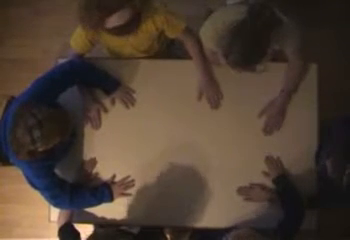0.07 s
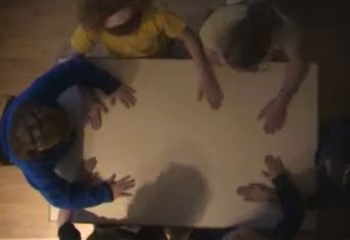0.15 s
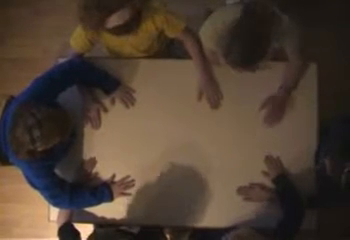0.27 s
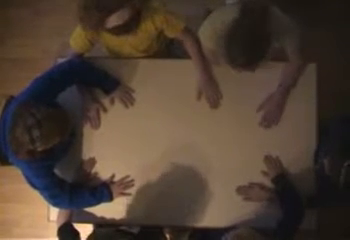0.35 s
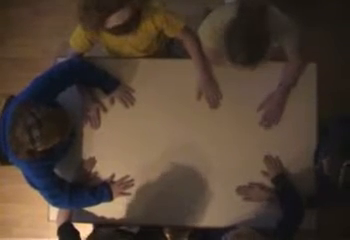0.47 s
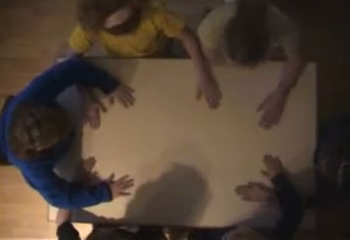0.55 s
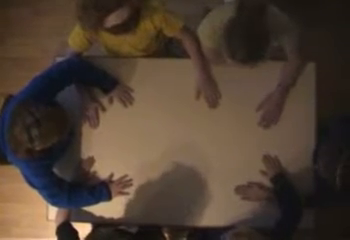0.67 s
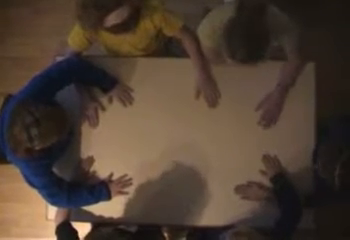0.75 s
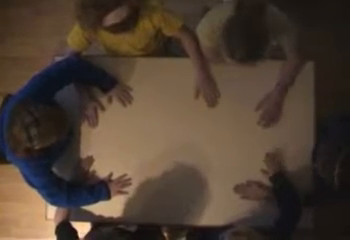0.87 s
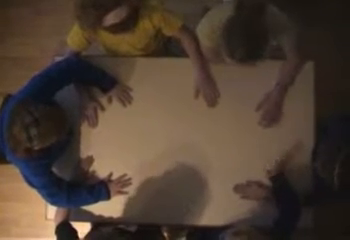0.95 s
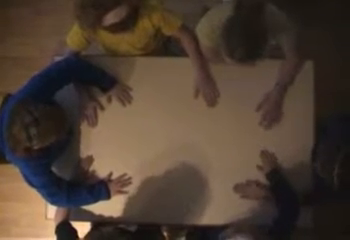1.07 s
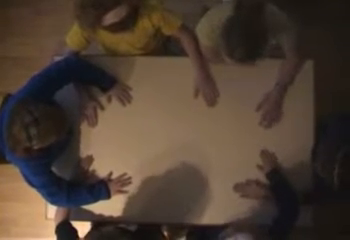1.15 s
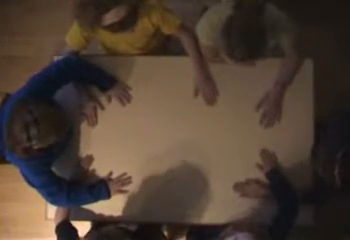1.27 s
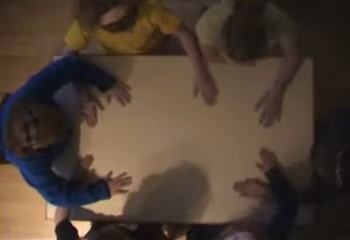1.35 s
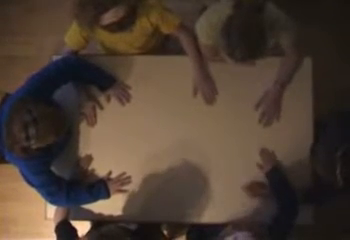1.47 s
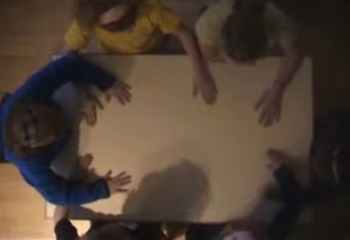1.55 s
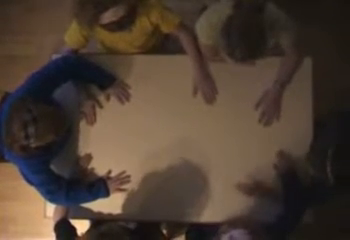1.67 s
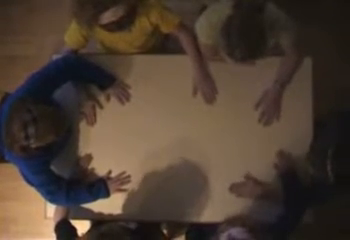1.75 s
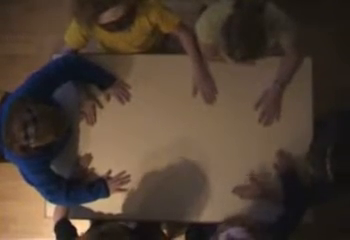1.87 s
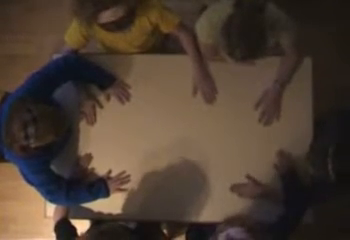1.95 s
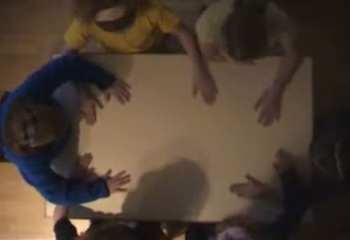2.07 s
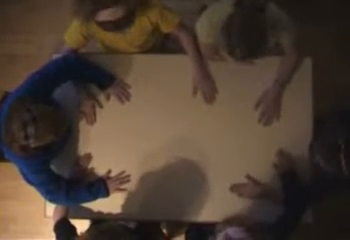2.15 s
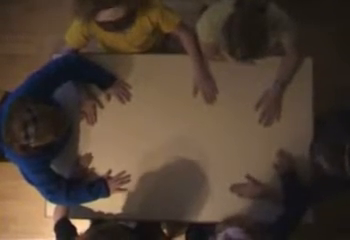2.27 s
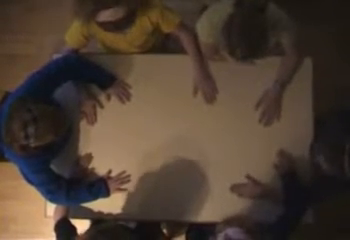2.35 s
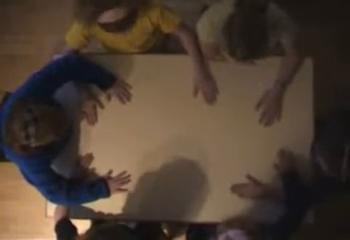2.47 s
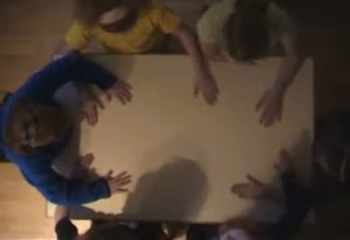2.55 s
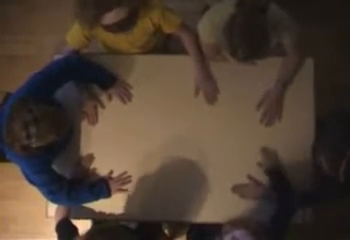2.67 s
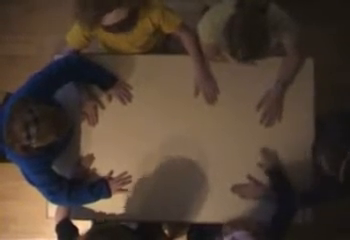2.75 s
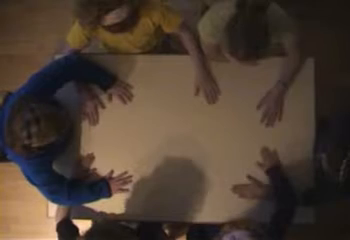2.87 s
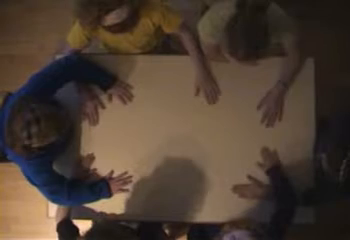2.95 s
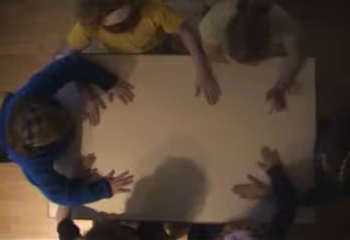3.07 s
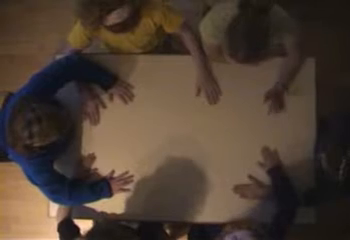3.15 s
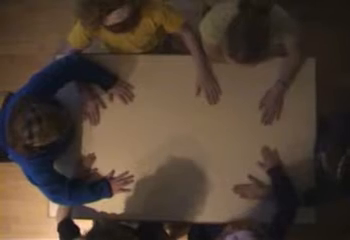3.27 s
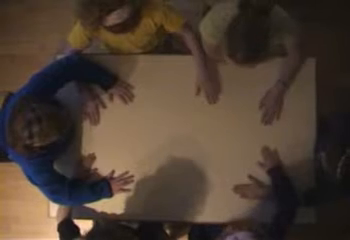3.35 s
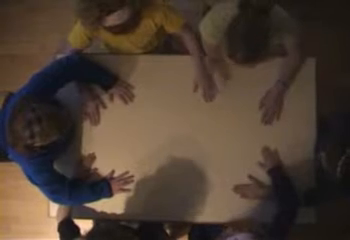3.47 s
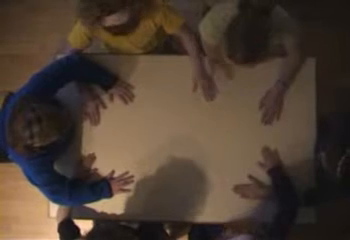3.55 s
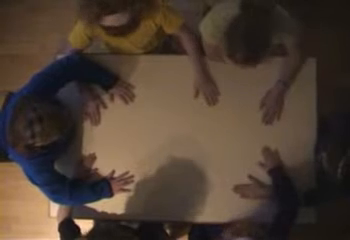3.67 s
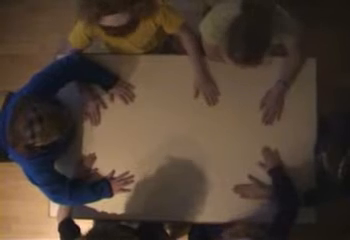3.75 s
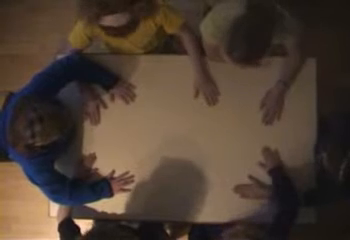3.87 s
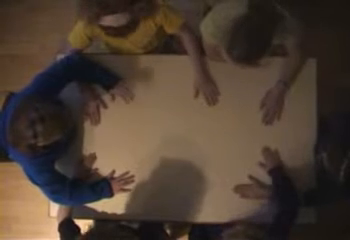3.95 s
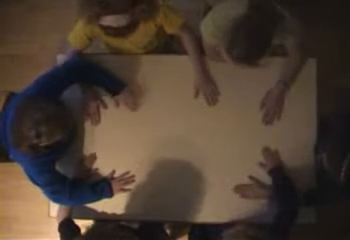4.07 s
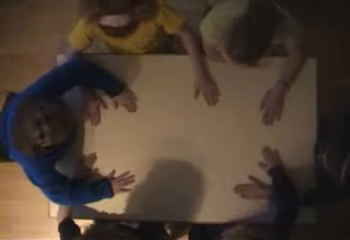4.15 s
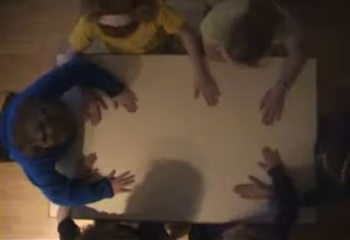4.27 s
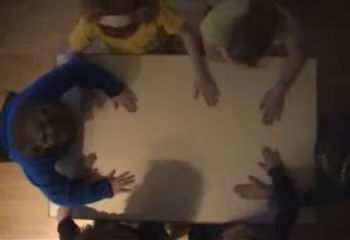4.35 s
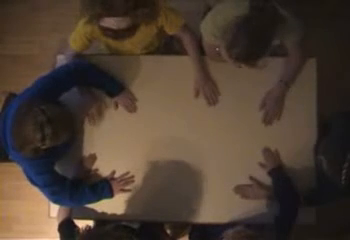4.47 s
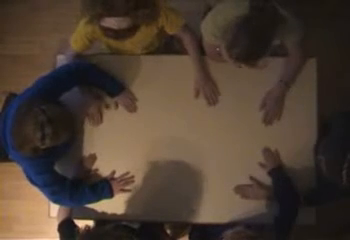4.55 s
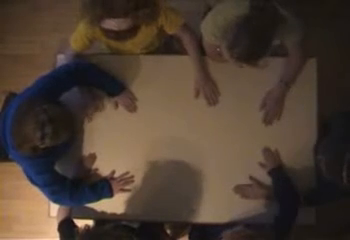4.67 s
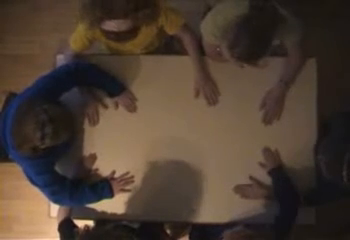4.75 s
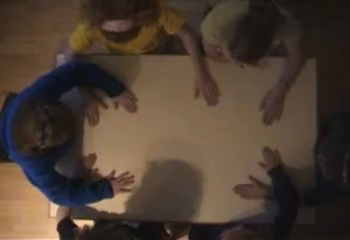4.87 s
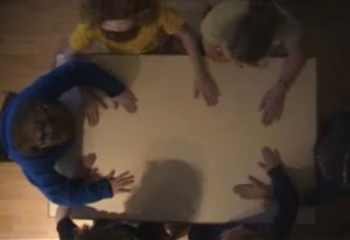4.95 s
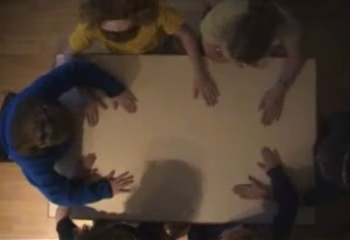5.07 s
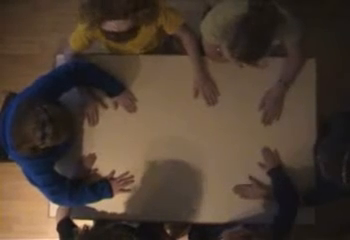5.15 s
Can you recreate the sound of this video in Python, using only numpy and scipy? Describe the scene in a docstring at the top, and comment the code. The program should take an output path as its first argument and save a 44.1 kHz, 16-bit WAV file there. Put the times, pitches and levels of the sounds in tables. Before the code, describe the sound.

Bare palms slap a wooden tabletop one at a time, unevenly spaced. A soft sleeve brush precedes a muffled double-contact slap, then a second brush and a bright, hard slap. A quick pair follows, then single slaps that come closer together and mostly softer. Each cracks, knocks and leaves a short room tail. The microphones are close, in stereo, with low hiss and a thin electronic whine.

```python
"""Flat-handed slaps on a tabletop

Hands slap a tabletop one after another in a bare room, under an overhead camera.
Each palm squeezes out a puff of air (a pressure pulse), the skin cracks and the board knocks (noise bursts),
the board rings (decaying sine modes), and the room answers with echoes and a diffuse tail.
Two sleeve brushes (swelling noise) come early; beneath lie room tone, hiss and a thin whine of steady tones."""
import sys
import numpy as np
from scipy import signal
from scipy.fft import rfft, irfft
from scipy.io import wavfile
from scipy.ndimage import uniform_filter1d

SR = 44100
rng = np.random.default_rng(int(sys.argv[2]) if len(sys.argv) > 2 else 0)


def output_pcm(signal):
    """Save a mono or channel-first signal as 16-bit PCM at the path in sys.argv[1].

    Samples are clipped to [-1, 1] before scaling.
    """
    pcm = np.clip(np.atleast_2d(signal).T, -1, 1) * 32767
    wavfile.write(sys.argv[1], SR, np.round(pcm).astype(np.int16))


N = 229394

SLAP_SAMPLES, LEAD_SAMPLES = 49152, 1024  # length of one slap, and the part of it before the palm lands
T = (np.arange(SLAP_SAMPLES) - LEAD_SAMPLES) / SR  # time from landing (s)
AFTER = np.maximum(T, 0)
HZ = np.fft.rfftfreq(SLAP_SAMPLES, 1 / SR)
SCENE_HZ = np.fft.rfftfreq(N, 1 / SR)
LANDING_S = 0.0011  # time the palm takes to close on the board


def amp(db):
    """Decibel law: 20 dB is a tenfold amplitude."""
    return 10 ** (np.asarray(db) / 20)


def read(points, hz):
    """Spectral envelope: joins (Hz, value) points by straight lines on a log-frequency axis."""
    f, value = np.transpose(points)
    return np.interp(np.log(hz + 1), np.log(f + 1), value)


def hump(hz, centre_hz, octaves):
    """Broad resonance: a bell curve on the log-frequency axis."""
    return np.exp(-(np.log2((hz + 1) / centre_hz) / octaves) ** 2)


def add(mix, start_s, sound):
    """Superposition: sums a two-channel sound into the mix from a given time."""
    part = mix[:, round(start_s * SR):][:, :sound.shape[1]]
    part += sound[:, :part.shape[1]]


def low_pass(x, hz):
    """Band limiting: a steep linear-phase low-pass on both channels."""
    taps = signal.firwin(255, hz, window=("kaiser", 9), fs=SR)
    return signal.oaconvolve(x, taps[None], "same")


def high_pass(x, hz):
    """Bass roll-off: a second-order high-pass."""
    return signal.sosfilt(signal.butter(2, hz, "high", fs=SR, output="sos"), x)


def stereo_noise(width, size):
    """Partial coherence: spectra of white noise at two close microphones, a common part plus and minus a side."""
    mid, side = rfft(rng.standard_normal((2, size)))
    side = side * amp(read(width, np.fft.rfftfreq(size, 1 / SR)))
    return np.array([mid + side, mid - side])


def burst(spectrum, rise_s, t60, delay_s):
    """Exponential growth and decay: shaped noise swells, peaks after the delay and dies away."""
    t = T - delay_s
    rise = np.exp(np.minimum(t, 0) / rise_s)
    decay = amp(-60 * np.maximum(t, 0) / t60)
    envelope = rise * decay
    return irfft(spectrum) * envelope / np.linalg.norm(envelope)


# tones of the camera's whine: pitch_hz, level_db (rms)
WHINE_TONES = [(2853, -73), (6277, -71.5), (7418, -72), (8468, -72.5), (8565, -80), (8656, -67.5),
               (9227, -71.5), (9609, -67), (9798, -81), (10180, -77)]


def whine():
    """Common frequency modulation: the sine tones of the camera share one slightly unsteady clock."""
    drift = uniform_filter1d(rng.standard_normal(N), size=3000)
    clock_s = np.cumsum(1 + 0.000307 * drift / drift.std()) / SR
    tones = sum(amp(level_db) * np.sin(2 * np.pi * (pitch_hz * clock_s + rng.random()))
                for pitch_hz, level_db in WHINE_TONES)
    return np.sqrt(2) * tones  # peak from rms


# spectrum of room tone and hiss: frequency_hz, relative level_db (per Hz)
QUIET_TONE = [(15, -8), (25, 6), (60, 2.5), (136, 6.5), (187, 4), (480, 2.5), (620, -4.5), (846, -2.5),
              (2500, -9.5), (3500, -12), (4700, -7), (6000, -13.5), (8600, -5), (12500, -15)]
# stereo width of room tone and hiss: frequency_hz, side_db (against mid)
QUIET_WIDTH = [(60, -8.5), (240, -11), (950, -9), (3770, -7.5), (15000, -1)]


def background():
    """Stationary noise: room tone and microphone hiss, with the camera's faint whine."""
    quiet_db, hiss_edge_hz = -52.5, 12600  # rms level before the low-pass, and its edge
    hiss = irfft(stereo_noise(QUIET_WIDTH, N) * amp(read(QUIET_TONE, SCENE_HZ)), N)
    return low_pass(amp(quiet_db) * hiss / hiss.std(), hiss_edge_hz) + whine()


# stereo width of sleeves, slap noise and room: frequency_hz, side_db (against mid)
WIDTH = [(100, -27), (400, -22), (1000, -17), (2000, -12.5), (4000, -12.5), (8000, -7.5), (12000, -3)]
# sleeves brushing as an arm swings: middle_s, length_s, level_db (rms at the loudest), pitch_hz
SLEEVES = [(0.393, 0.15, -55, 1970), (1.077, 0.15, -57, 1460)]


def sleeve(middle_s, length_s, level_db, pitch_hz):
    """Friction noise: cloth brushes softly in one broad band, loudest in the middle of the swing."""
    rub = irfft(stereo_noise(WIDTH, N) * hump(SCENE_HZ, pitch_hz, octaves=1.2), N)
    swing = np.exp(-(2 * (np.arange(N) / SR - middle_s) / length_s) ** 2)
    return amp(level_db) * swing * rub / rub.std()


def radiated(pressure, low_hz):
    """Acoustic short circuit: below low_hz the air just flows around a small or open source."""
    return high_pass(pressure, low_hz)


def air_puff(squeeze_s):
    """Compression and rarefaction: pressure builds under the falling palm, then swings negative as it stops."""
    u = T / squeeze_s
    pulse = -u * np.exp(1 - abs(u))
    return radiated(pulse, low_hz=146.9)


# spectrum of skin meeting the board: frequency_hz, relative level_db
CRACK_TONE = [(200, -25), (900, 18.5), (2000, 10), (3200, 14.5), (5000, 13), (6500, -1), (9000, 5.5),
              (13000, -2), (15000, -11)]


def skin_crack(snap):
    """Impact noise: a very short burst, favouring the band of the air that escapes between the fingers."""
    snap_db = 6
    skin = stereo_noise(WIDTH, SLAP_SAMPLES) * amp(read(CRACK_TONE, HZ) + snap_db * snap)
    crack = burst(skin, rise_s=.8 * LANDING_S, t60=.009, delay_s=-.0002)
    return crack * amp([[-1.2], [1.2]])  # a little louder on the right


# first echoes from floor, ceiling and walls: delay_s, level_db (against the direct sound)
ECHOES = [(.0046, -16), (0.0122, -16), (0.0131, -12), (.0144, -17.5), (0.0238, -18.5)]


def with_echoes(sound):
    """Specular reflection: nearby hard surfaces repeat the sharp part of the slap."""
    out = sound.copy()
    for delay_s, level_db in ECHOES:
        add(out, delay_s, amp(level_db) * sound)
    return out


def knock(colour):
    """Damped impact: palm and board give a dull noise burst in the middle range."""
    woody = HZ ** 2 / (HZ ** 2 + 130 ** 2) / np.hypot(1, HZ / 1200)
    spectrum = stereo_noise(WIDTH, SLAP_SAMPLES) * colour * woody
    return burst(spectrum, rise_s=1.3 * LANDING_S, t60=0.05, delay_s=0.0026)


# bending modes of the tabletop, the main one first: pitch_hz, level_db (before the hand's drive), t60_s
BOARD_MODES = [(136, -15.5, 0.15), (80, -58.5, 0.83), (151, -31.5, 0.71), (167, -28, 0.29),
               (233.8, -29, 0.52), (333.5, -25.5, 0.36), (442, -34, 0.35), (500, -27, 0.22),
               (722, -32.5, 0.62), (921, -33, 0.44), (1166, -41.5, 0.72), (1363, -30.5, 0.31),
               (1977, -64, 0.4), (2234, -40.5, 0.57)]


def board_ring(hand_db, thump_db):
    """Modal superposition: each mode rings as hard as the hand drives it, the main one also by arm weight."""
    hz, level_db, t60 = np.transpose(BOARD_MODES)[:, :, None]
    level_db = level_db + np.interp(hz, HZ, hand_db) + thump_db * (hz == hz[0])
    # the board is pushed away first, so low modes start negative
    sign = np.where(hz < 200, -1, rng.choice([-1, 1], hz.shape))
    modes = sign * amp(level_db - 60 * AFTER / t60) * np.sin(2 * np.pi * hz * AFTER)
    return radiated(modes.sum(0), low_hz=51)


# reverberation of the room: band centre_hz, t60_s
ROOM_DECAY = [(60, 0.76), (150, 0.65), (350, 0.54), (800, 0.67), (1800, 0.68), (4500, 0.77), (8000, 0.57),
              (13000, 0.36)]


def room_tail(colour):
    """Diffuse reverberation: noise sets in among the first echoes, and each band dies at its own speed."""
    spectrum = stereo_noise(WIDTH, SLAP_SAMPLES) * colour
    centres, t60s = np.transpose(ROOM_DECAY)
    tail = 0
    for one, t60 in zip(np.eye(len(ROOM_DECAY)), t60s):
        band = read(np.c_[centres, one], HZ)  # a triangle that overlaps its neighbours
        tail = tail + burst(spectrum * band, rise_s=0.00053, t60=t60, delay_s=0.00665)
    return tail


def hand_shape(weight_db, hollow_hz, hollow_db, smack_hz, sting_db):
    """Source filtering: a heavy arm adds bass, a cupped palm a hollow note, fingers a smack, taut skin a sting."""
    smack_db = 4.5  # the same for every hand
    bass = 1 / (1 + (HZ / 200) ** 4)
    treble = 1 - 1 / (1 + (HZ / 3000) ** 4)
    hollow = hump(HZ, hollow_hz, octaves=0.4)
    smack = hump(HZ, smack_hz, octaves=0.64)
    return weight_db * bass + hollow_db * hollow + smack_db * smack + sting_db * treble


# spectrum of an average slap: frequency_hz, relative level_db
SLAP_TONE = [(25, 15), (55, 17.5), (85, 25), (150, 22.5), (350, 26), (750, 22.5), (1300, 18), (2200, 11),
             (3200, 4), (5000, 2.5), (7000, -2), (9500, -5.5), (13000, -7.5), (15000, -31)]
# one row a contact: start_s, force_db, arm weight_db, hollow_hz (under the palm), hollow_db,
#   finger smack_hz, skin sting_db, crack_db, crack_hz
SLAPS = [ (0.5039, -11.5, -13, 604, 11.5, 1310, 6, -22, 3160),
         (0.5095, -5, 7.5, 446, 11, 1170, 3.5, -8.5, 9000),
         (1.2305, 3.5, -6, 320, 2, 1530, -2.5, -2.5, 4000),
         (1.8643, -.5, 7.5, 162.4, 4.5, 2130, 4, -2.5, 3880),
         (2.0903, 3.5, -1.5, 940, 4, 1170, -0.5, 2, 4700), (2.8198, 2.5, -4, 333, 4.5, 1680, -1, -3, 8400),
         (3.3874, -5, 4, 315, 5.5, 1454, 3.5, -9, 3200), (3.8189, 1.5, 6, 198, 5.5, 694, -4.5, -4.5, 4770),
         (4.2626, -6.5, 8.5, 195, 11, 630, 3.5, -10, 5150), (4.6539, -3, 7, 210, 4.5, 586, 1.5, -8, 3540),
         (4.9017, -7.5, -0.5, 64, 12.5, 1290, 2, -13.5, 3470), ]


def slap(force_db, weight_db, hollow_hz, hollow_db, smack_hz, sting_db, crack_db, crack_hz):
    """Impact excitation: one hand drives puff, crack, knock, board ring and room together."""
    puff_db = -9 + 0.93 * force_db - 0.37 * weight_db  # a fast, light hand squeezes out the most air
    knock_db = -3.5 - .8 * force_db  # the gentler the slap, the larger the share of dull knock
    thump_db = -4 + 0.59 * weight_db  # a heavy arm bends the whole board
    room_db, snap_in_room_db = 1.63, 3.5
    hand_db = force_db + hand_shape(weight_db, hollow_hz, hollow_db, smack_hz, sting_db)
    colour = amp(read(SLAP_TONE, HZ) + hand_db)
    snap = hump(HZ, crack_hz, octaves=0.28)
    puff = amp(puff_db) * air_puff(squeeze_s=0.00043)
    crack = amp(crack_db) * skin_crack(snap)
    dull = amp(knock_db) * knock(colour)
    ring = board_ring(hand_db, thump_db)
    room = amp(room_db) * room_tail(colour * amp(snap_in_room_db * snap))
    return with_echoes(puff + crack) + dull + ring + room


def scene():
    """Linear superposition: slaps and sleeves over the quiet room."""
    mix = background()
    mix += sum(sleeve(*row) for row in SLEEVES)
    for start_s, *hand in SLAPS:
        add(mix, start_s - LEAD_SAMPLES / SR, slap(*hand))
    return mix * amp([[-.3], [.3]])  # left and right balance in dB


def record(dry):
    """Transducer limits: the microphone sheds the deepest bass, rounds off loud peaks and band-limits."""
    bass_cut_hz, ceiling, edge_hz = 33, .85, 14600
    heard = high_pass(dry, bass_cut_hz)
    rounded = heard / (1 + (heard / ceiling) ** 6) ** (1 / 6)
    return low_pass(rounded, edge_hz)


dry = scene()
out = record(dry)
output_pcm(out)
```